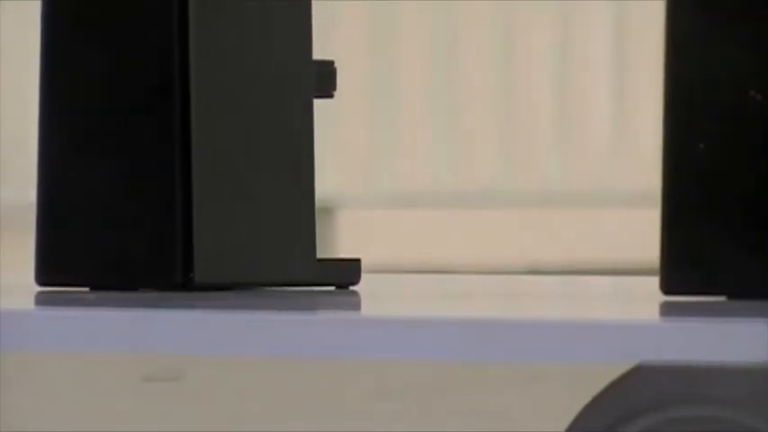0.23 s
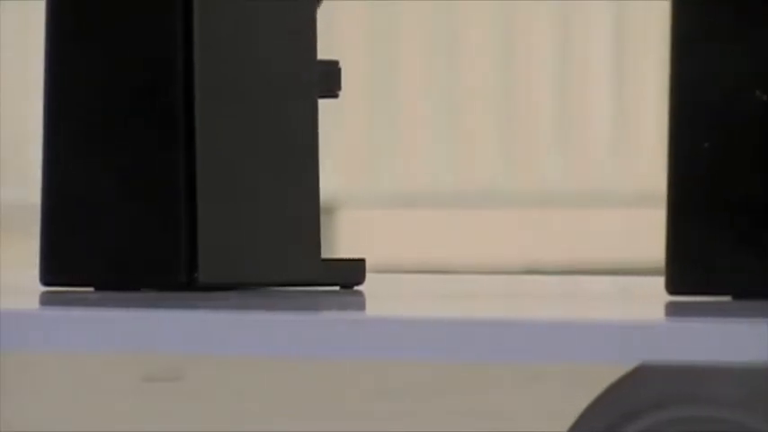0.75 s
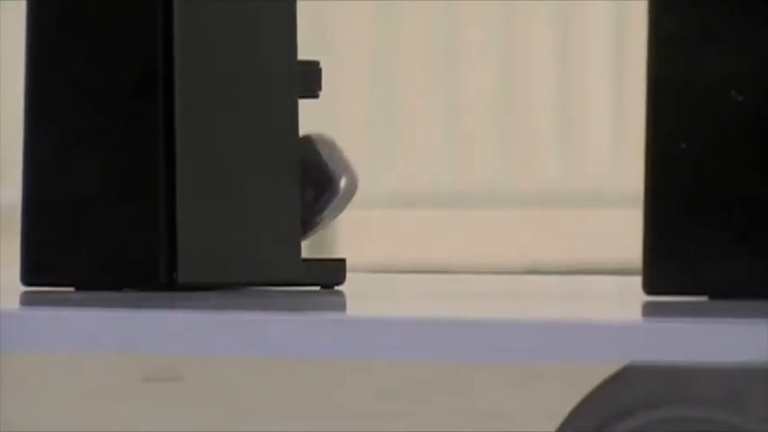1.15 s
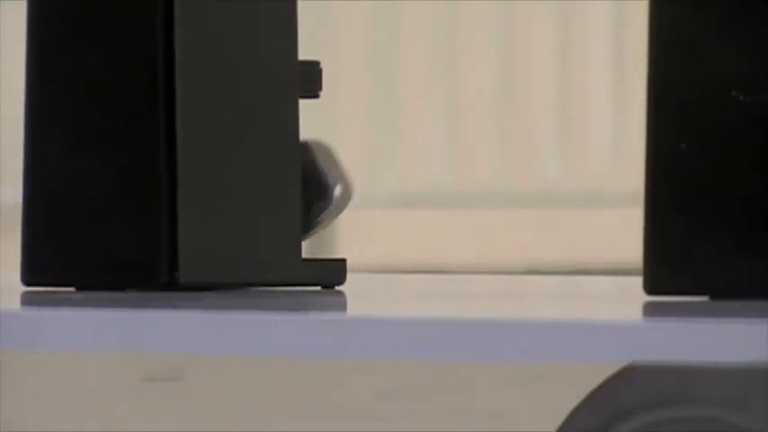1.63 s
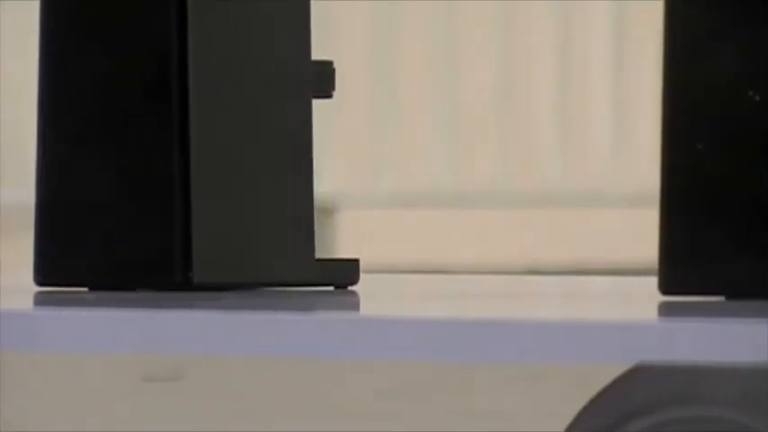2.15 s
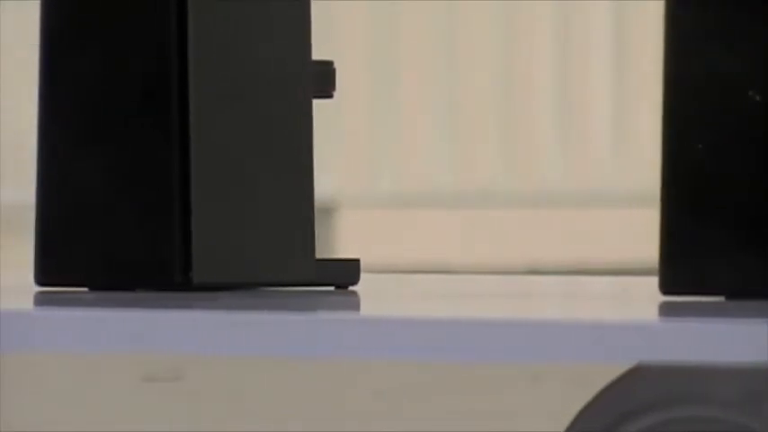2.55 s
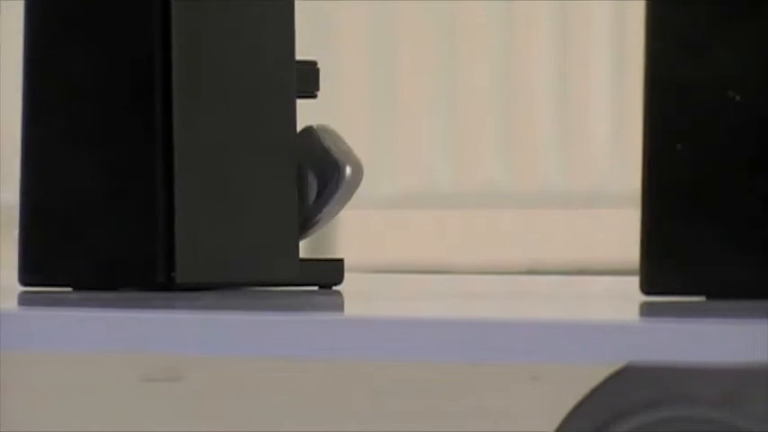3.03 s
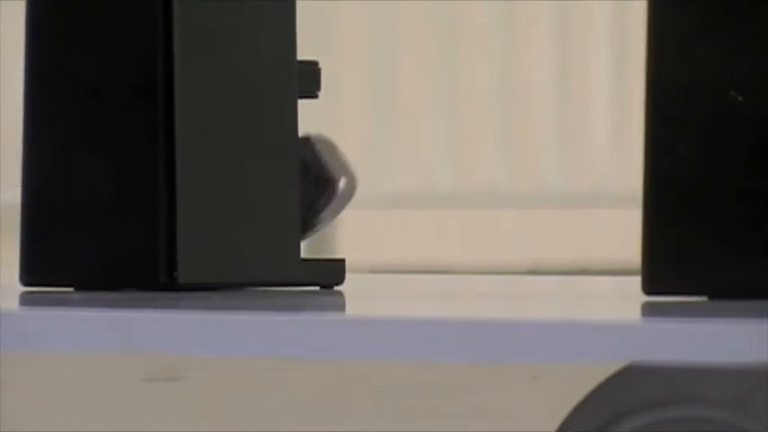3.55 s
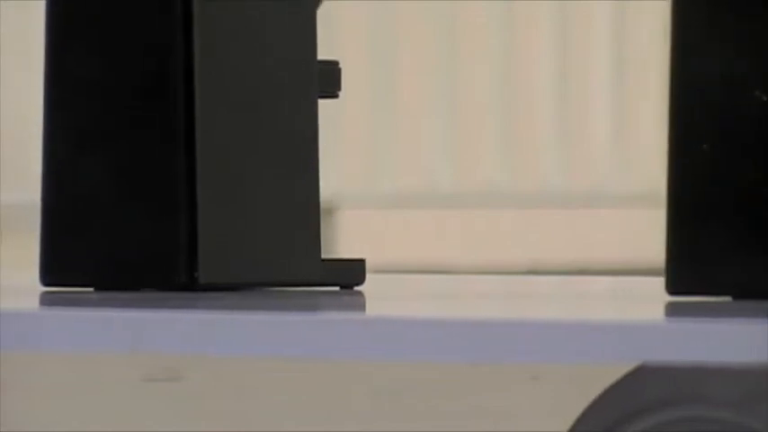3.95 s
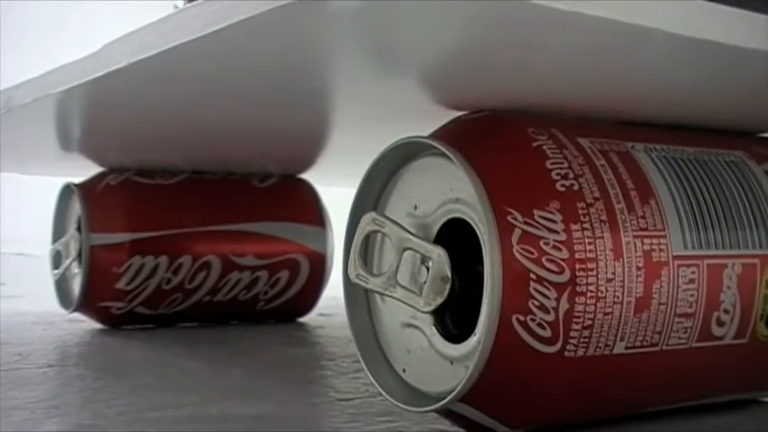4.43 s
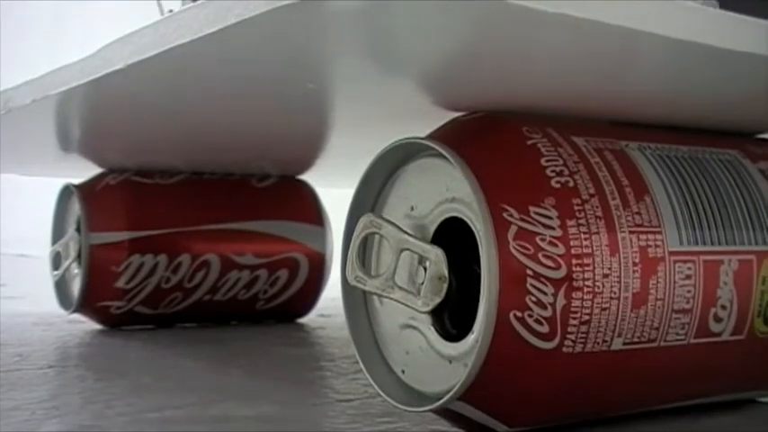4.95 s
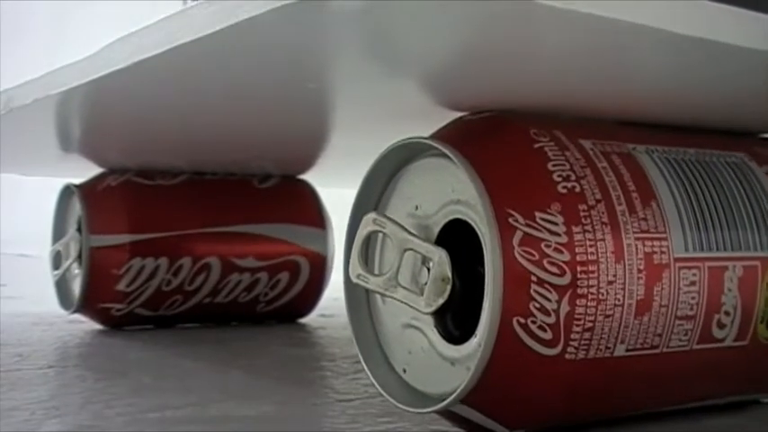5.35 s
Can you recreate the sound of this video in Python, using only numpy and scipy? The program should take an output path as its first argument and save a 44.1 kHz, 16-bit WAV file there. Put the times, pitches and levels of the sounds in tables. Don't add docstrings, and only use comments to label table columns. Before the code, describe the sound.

Three small wind-up metronomes click rapidly almost in unison in a bare ringing room, then cut to a louder, closer view under their board.

```python
import sys
import numpy as np
from scipy import signal
from scipy.fft import rfft, irfft, next_fast_len
from scipy.io import wavfile

SR = 44100
rng = np.random.default_rng(int(sys.argv[2]) if len(sys.argv) > 2 else 0)


def convert_level_to_amplitude(level_db):
    exponent = np.asarray(level_db, float) / 20
    return 10 ** exponent


def log_audio(samples):
    frames = np.atleast_2d(samples).T
    limited = np.clip(frames, -1, 1)
    pcm = np.round(limited * 32767).astype(np.int16)
    wavfile.write(sys.argv[1], SR, pcm)


N = 246519
SCENE_CHANGE_S = 4.041

# [first blow t/s, beat t/s, back swing late t/s, limp growth per beat t/s]; then beats
GAITS_BESIDE = [(.03696, .317686, -.00073, -.000157), (.04255, .317687, .00129, -.000022),
                (.05804, .317618, -.00096, .000689)], 13
# [f/Hz, width f/Hz, level/dB]
CASES_BESIDE = [
    [(1310, 270, -20.5), (2150, 470, 7.5), (2830, 64, -13), (3140, 110, 2), (3850, 620, 8.5),
     (4800, 640, 12), (5040, 120, 11), (6630, 270, 10), (6840, 180, -13), (9100, 100, -12),
     (10360, 320, 3.5), (14100, 850, 6)],
    [(1210, 186, 12), (2180, 170, 17.5), (2760, 120, 9.5), (3340, 82, -13), (3730, 135, 23),
     (4830, 590, 14.5), (5450, 120, 8.5), (6380, 63, 19), (7730, 190, 7), (8500, 190, 2), (11650, 400, 5),
     (13100, 190, -4)],
    [(1090, 160, 6.5), (1745, 93, -12), (2320, 200, 8), (2730, 79, -12), (3340, 450, 10), (4200, 400, 4),
     (4600, 190, 9.5), (5570, 110, -15), (6050, 63, -41), (6380, 80, 1.5), (7930, 88, -10),
     (9650, 170, -29), (13100, 190, -9)],
]
# [delay t/s, level/dB]
REBOUNDS_BESIDE = [
    [(0.00032, -2), (0.00084, -6.5), (0.00301, -16), (0.00392, -21), (0.00461, -18)],
    [(0.00038, -15), (0.0007, -9.5), (0.00317, -12.5), (0.00465, -23)],
    [(0.00036, 1.5), (0.00053, 3.5), (0.00325, -5), (0.00356, -12), (0.0061, -10)],
]
# left-right of each case [level/dB], then scatter [level/dB], scatter t60 [t/s],
# scatter width [level/dB], back swing [level/dB], board [level/dB]
PLACE_BESIDE = (0.63, .3, 0.94), -25, 0.044, -15.5, 0.03, 14.2
# [f/Hz, level per Hz/dB]
ROOM_COLOUR_BESIDE = [(150, -67), (250, -9.5), (436, -11.5), (723, -5), (875, -9.5), (1140, -1.5),
                      (1330, -12), (1700, -3.5), (2400, 2.5), (3010, -8.5), (3580, -6.5), (6700, -10.5),
                      (10000, -19.5), (16000, -57)]


def metronomes_beside():
    return metronomes(GAITS_BESIDE, CASES_BESIDE, REBOUNDS_BESIDE, PLACE_BESIDE, ROOM_COLOUR_BESIDE,
                      room_db=-31, seating_s=.00008)


# [first blow t/s, beat t/s, back swing late t/s, limp growth per beat t/s]; then beats
GAITS_BELOW = [(4.18400, .31656, -.00187, 0), (4.18545, .31678, .00335, 0), (4.20676, .31657, .00405, 0)], 5
# [f/Hz, width f/Hz, level/dB]
CASES_BELOW = [
    [(1080, 96, 6), (2150, 240, 22), (2750, 140, 21), (3710, 160, 23), (4250, 134, 21), (5700, 100, 24.5),
     (6690, 130, 18), (7020, 190, 23.5), (8400, 150, 10), (10000, 170, -25), (10500, 170, -23),
     (11800, 190, -15)],
    [(1055, 150, 13.5), (2040, 110, 18), (2956, 110, 16), (3230, 160, 14.5), (3600, 160, 15),
     (4560, 400, 15), (5530, 350, 8), (6360, 210, 1), (7750, 150, -7), (8300, 140, -10), (10100, 170, -21),
     (12600, 190, -9)],
    [(1270, 77, -27), (1950, 77, 15.5), (2490, 146, 19), (2730, 130, 10), (3600, 170, 15.5),
     (4170, 320, 19.5), (4810, 310, 16), (5060, 160, 16.5), (6240, 160, 11.5), (7870, 100, 11.5),
     (9600, 190, -27), (10500, 160, -22), (12400, 190, -9)],
]
# [delay t/s, level/dB]
REBOUNDS_BELOW = [
    [(.0005, -5), (.00147, -3.5), (.00243, -9.5), (.0048, -21)],
    [(.0005, 2.5), (.0034, -5.5), (.0044, -16), (.0050, -2.5)],
    [(.00039, 2), (.00148, -1), (.0044, -10), (.0047, -6), (.0065, -8.5)],
]
PLACE_BELOW = (-1.6, 0.94, -1.2), -29.5, 0.038, -4.5, -0.03, 19.1
# [f/Hz, level per Hz/dB]
ROOM_COLOUR_BELOW = [(150, -64), (250, -30), (303, -29), (400, -19.5), (607, -18), (674, -37), (1100, -13),
                     (1240, -23.5), (2360, -3.5), (2860, -15), (5440, -18.5), (7060, -27), (10000, -34.5),
                     (16000, -60)]


def metronomes_below():
    return metronomes(GAITS_BELOW, CASES_BELOW, REBOUNDS_BELOW, PLACE_BELOW, ROOM_COLOUR_BELOW,
                      room_db=-31.5, seating_s=.00041)


def metronomes(gaits, cases, rebounds, place, colour, room_db, seating_s):
    pans, scatter_db, t60, width_db, swing_db, board_db = place
    out, run_in = 0, SR
    for k, times in enumerate(blow_times(*gaits)):
        answer = room(colour, room_db)
        ring, board = case(cases[k], rebounds[k], board_db, seating_s)
        tick = scattered(ring, pans[k], scatter_db, t60, width_db) + board
        answer[:, :tick.shape[1]] += tick

        blows = np.zeros(N + run_in)
        back_swing = np.arange(len(times)) % 2
        strength_db = swing_db * back_swing + rng.normal(0, .3, len(times))
        blows[np.round(times * SR).astype(int) + run_in] = convert_level_to_amplitude(strength_db)
        ticking = signal.fftconvolve(answer, blows[None]) [:, run_in:run_in + N]
        out = out + ticking + rattle(blows, ring)[run_in:run_in + N]
    return out


def blow_times(gaits, beats):
    k = np.arange(-2, beats)
    times = []
    for first, beat, limp, growth in gaits:
        late = (limp + growth * np.maximum(k, 0)) * (k % 2)
        times.append(first + beat * k + late)
    return times


# [f/Hz, width f/Hz, level/dB]
BOARD = [
    (326, 13, -7.5),
    (380.7, 19, 1.5),
    (503, 19, -5),
]


def case(modes, rebounds, board_db, seating_s, size=8192):
    blow = np.zeros(size)
    blow[0] = 1
    board = sum(resonate(blow, hz, width, db + board_db) for hz, width, db in BOARD)
    board = cut(cut(board, 340, "high", order=2), 650, "low", order=2)

    for delay, db in rebounds:
        blow[round(delay * SR)] += convert_level_to_amplitude(db)
    rings = sum(resonate(blow, hz, max(width, 200), db) for hz, width, db in modes)
    rings = cut(rings, 960, "high", order=6)
    rings = cut(rings, 9000, "low", order=2)
    rings = rings * (1 - np.exp(-np.arange(size) / SR / seating_s))
    return cut(rings, 12000, "low", order=4), board


def resonate(blow, hz, width, db):
    r, w = np.exp(-np.pi * width / SR), 2 * np.pi * hz / SR
    gain = 2 * (1 - r) * np.sin(w) * convert_level_to_amplitude(db)
    return signal.lfilter([0, gain], [1, -2 * r * np.cos(w), r * r], blow)


def cut(x, hz, kind, order):
    return signal.sosfilt(signal.butter(order, hz, kind, fs=SR, output="sos"), x)


def rattle(blows, ring):
    rattle_db, rattle_t60_s = -31, .025
    decay = convert_level_to_amplitude(-60 / (rattle_t60_s * SR))
    shaken = signal.lfilter([convert_level_to_amplitude(rattle_db)], [1, -decay], blows + 1e-18)
    return signal.fftconvolve(shaken * rng.standard_normal(len(blows)), ring)


def scattered(tick, pan_db, scatter_db, t60, width_db):
    t = np.arange(len(tick)) / SR
    envelope = convert_level_to_amplitude(scatter_db - 60 * t / t60) * (t > .0012)
    mid, side = rng.standard_normal((2, len(tick))) * envelope
    side = convert_level_to_amplitude(width_db) * side
    cloud = signal.fftconvolve([mid + side, mid - side], tick[None])
    return (tick + cloud[:, :len(tick)]) * convert_level_to_amplitude(np.array([[pan_db], [-pan_db]]) / 2)


# [f/Hz, t60 t/s]
ROOM_DECAY = [(400, 0.97), (1200, 0.96), (2300, 0.87), (4500, 0.82), (9000, 0.7), (14000, 0.27)]


def room(colour, level_db, size=65536):
    hz, noise = wide_noise(colour, size)
    t, out = np.arange(size) / SR, 0
    centres = np.array(ROOM_DECAY)[:, 0]
    for centre, t60 in ROOM_DECAY:
        share = np.interp(np.log(hz), np.log(centres), centres == centre)
        out = out + irfft(noise * share) * convert_level_to_amplitude(level_db - 60 * t / t60)
    return out * (1 - np.exp(-t / 0.0013)) ** 2


# [f/Hz, side over mid level/dB]
WIDTH = [(60, -13), (300, -14.5), (700, -13.5), (1500, -9.5), (4000, -11), (8000, -7), (13000, 7.5)]


def wide_noise(colour, size):
    hz = np.arange(size // 2 + 1) * SR / size + 1
    mid, side = rfft(rng.standard_normal((2, size))) * convert_level_to_amplitude(at_hz(colour, hz))
    pair = mid + side * convert_level_to_amplitude(at_hz(WIDTH, hz)) * [[1], [-1]]
    return hz, pair * size / np.sqrt(2 * np.sum(np.abs(mid) ** 2))


def at_hz(points, hz):
    table_hz, values = np.transpose(points)
    return np.interp(np.log(hz), np.log(table_hz), values)


# [f/Hz, width f/Hz, level/dB]
FLOOR = [(178.4, 12, -8), (250, 49, -5), (402.5, 9.8, -2), (482, 13.4, 0.5), (626, 37, -7), (730, 140, -12),
         (900, 80, -10), (1220, 160, -14)]
# [t/s, level/dB, softness cut f/Hz]
FLOOR_KNOCKS = [
    (.157, 20, 2470),
    (.169, 21.5, 1100),
    (0.184, -4, 600),
    (0.197, 8, 1800),
    (0.599, 16, 330),
    (0.614, 14, 280),
    (1.741, 15.5, 250),
    (3.342, -11, 300),
    (3.381, 4, 250),
    (5.28, 6, 200),
]


def knocks():
    out, size = np.zeros(N), SR // 2
    balance_db = rng.normal(0, 2, (len(FLOOR_KNOCKS), len(FLOOR)))
    for (s, db, cut_hz), shifts in zip(FLOOR_KNOCKS, balance_db):
        blow = cut(np.arange(size) == 0, cut_hz, "low", order=2)
        rings = 0
        for k, ((hz, width, level), shift) in enumerate(zip(FLOOR, shifts)):
            rings = rings + resonate(blow, hz, width, db + level + 6.0 + shift) * (-1) ** k
        i = round(s * SR)
        out[i:i + size] += rings[:N - i]
    return out


# [t/s, peak level/dB, f/Hz, t60 t/s]
BUMP_WASH = [
    (.16, -19, 446, 0.61),
    (.603, -25, 250, 0.42),
    (1.32, -54, 232, 2.7),
    (1.63, -35, 413, 1.9),
    (2.06, -59, 107, 0.24),
    (3.345, -37, 238, 0.32),
    (3.56, -27.5, 760, 0.95),
    (5.262, -30, 800, 0.045),
    (5.277, -19.5, 1010, 0.03),
]


def bumps():
    return puffs(BUMP_WASH, octaves=0.71, width_db=-14)


# [t/s, peak level/dB, f/Hz, t60 t/s]
DRY_RUSTLES = [(1.86, -47, 7000, 0.33), (1.90, -46, 7000, 0.31), (2.522, -35, 7100, 0.78),
               (2.66, -50, 8000, .6), (2.71, -40, 7960, .6), (2.76, -46, 8000, .6), (3.346, -34, 3500, .05),
               (4.12, -54, 12000, .015), (4.168, -46, 11000, .015), (4.178, -47, 10100, .015),
               (4.798, -32, 7000, 0.032), (4.93, -51, 8500, .3), (5.08, -47, 9000, .05)]


def rustles():
    return cut(puffs(DRY_RUSTLES, octaves=.7, width_db=-2), 11000, "low", order=4)


def puffs(events, octaves, width_db):
    out, size = np.zeros((2, N)), SR // 2
    t = np.arange(size) / SR
    for s, db, hz, t60 in events:
        edges = [hz * 2 ** -octaves, min(hz * 2 ** octaves, .45 * SR)]
        band = signal.butter(2, edges, "band", fs=SR, output="sos")
        mid, side = signal.sosfilt(band, rng.standard_normal((2, size)))
        pair = (mid + convert_level_to_amplitude(width_db) * side * [[1], [-1]]) / mid.std()
        burst = pair * convert_level_to_amplitude(db - 6 - 60 * t / t60) * np.minimum(t / 0.0013, 1)
        i = round(s * SR)
        out[:, i:i + size] += burst[:, :N - i]
    return out


# [f/Hz, level per Hz/dB]
AIR_COLOUR = [(15, -61), (25, -31), (82, -8), (180, -6.5), (249, -10.5), (439, -65), (503, -3),
              (1100, -0.5), (1520, -1), (2410, 8), (2840, -3), (5430, -7), (8590, -25.5), (13600, -40),
              (16000, -68)]
RUMBLE_COLOUR = [(88, -51), (150, -13.5), (226, -2.5), (334, -0.5), (377, 3), (434, 0.5), (712, 3),
                 (870, -1.5), (1020, 0), (1200, -1), (1560, -9), (2640, -120)]
HUM_COLOUR = [(13, -64), (22, -32), (32, -30), (51, -17), (80, 5.5), (118, -7), (146, 7), (177, -22),
              (200, 8), (260, -19), (440, -120)]
# [t/s, half length t/s, rumble rise level/dB, hum rise level/dB]
MURMUR_SWELLS = [
    (0.406, 0.49, 8, 1.5),
    (0.89, 0.27, 4, 4),
    (2.115, 0.6, 2.5, 11.5),
    (2.71, 0.11, -1, 7),
    (3.36, 0.18, 10.5, 15),
    (3.63, 0.2, 5.5, 14.5),
    (4.813, 0.049, 8, 6),
]


def murmur():
    t = np.arange(N) / SR
    humps = np.array([np.maximum(1 - np.abs(t - s) / half, 0) for s, half, _, _ in MURMUR_SWELLS])
    rumble_rise_db, hum_rise_db = np.array(MURMUR_SWELLS)[:, 2:].T @ humps
    is_beside = t < SCENE_CHANGE_S
    air_db = np.where(is_beside, -43.5, -40.5)
    rumble_db = np.where(is_beside, -46.5, -49.5) + rumble_rise_db
    hum_db = np.where(is_beside, -67.5, -77) + hum_rise_db
    return noise_bed(AIR_COLOUR, air_db) + noise_bed(RUMBLE_COLOUR, rumble_db) + noise_bed(HUM_COLOUR, hum_db)


def noise_bed(colour, level_db):
    _, noise = wide_noise(colour, next_fast_len(N) * 2)
    return convert_level_to_amplitude(level_db) * irfft(noise)[:, :N]


# [start t/s, length t/s, f/Hz, level/dB]
FAR_DRONES = [
    (0.0, 2.3, 96, -64),
    (1.25, 0.33, 74, -62),
    (1.298, 0.57, 234, -53),
    (1.95, 0.276, 92, -60),
    (2.645, 0.39, 95, -61),
]


def drones():
    ease_s, waver_hz = 0.053, 2.7
    t, out = np.arange(N) / SR, 0
    phases = rng.uniform(0, 2 * np.pi, (len(FAR_DRONES), 2))
    for (s, length, hz, db), phase in zip(FAR_DRONES, phases):
        ease = np.clip(np.minimum(t - s, s + length - t) / ease_s, 0, 1)
        pitch = hz + waver_hz * np.sin(2 * np.pi * 2.57 * t + phase[0])
        out = out + convert_level_to_amplitude(db + 1) * ease * np.sin(2 * np.pi * np.cumsum(pitch) / SR + phase[1])
    return out


def hiss():
    return convert_level_to_amplitude(-79) * rng.standard_normal((2, N))


def scene():
    t = np.arange(N) / SR
    ticking = np.where(t < SCENE_CHANGE_S, metronomes_beside(), metronomes_below())
    mix = ticking + knocks() + bumps() + rustles() + murmur() + drones() + hiss()
    fade_out_s, fade_in_s, fade_depth = .1, .1, .025
    away = np.maximum((SCENE_CHANGE_S - t) / fade_out_s, (t - SCENE_CHANGE_S) / fade_in_s)
    return np.clip(away, fade_depth, 1) * mix


def roll_off(x):
    return signal.sosfilt(signal.butter(12, 16440, fs=SR, output="sos"), x)


def record(dry):
    loud = dry * convert_level_to_amplitude(np.array([[.35], [-.35]]))
    rounded = 1.8 * np.tanh(loud / 1.8)
    rounded = cut(cut(rounded, 15500, "low", order=6), 30, "high", order=2)
    return roll_off(np.clip(rounded, -1, 1))


dry = scene()
out = record(dry)
log_audio(out)
```